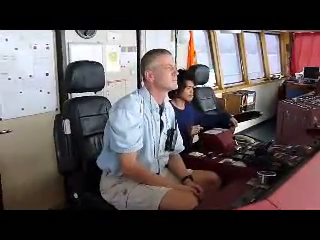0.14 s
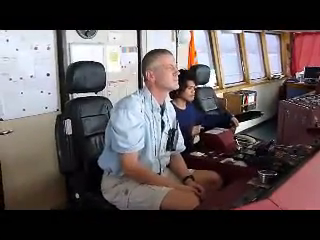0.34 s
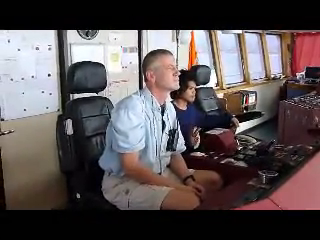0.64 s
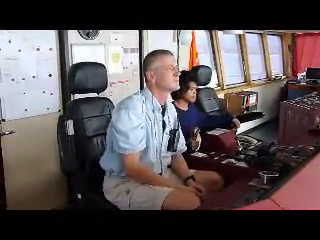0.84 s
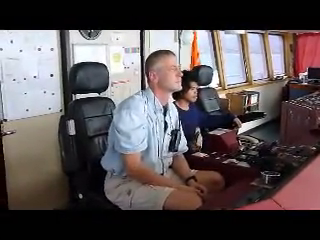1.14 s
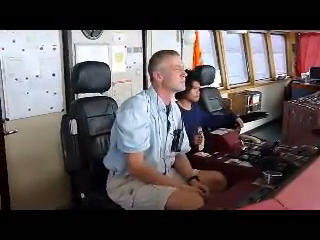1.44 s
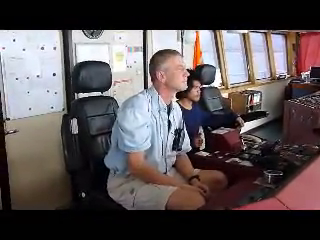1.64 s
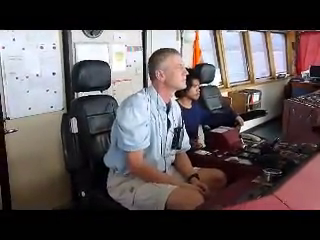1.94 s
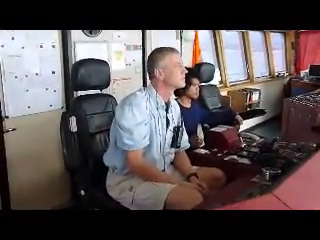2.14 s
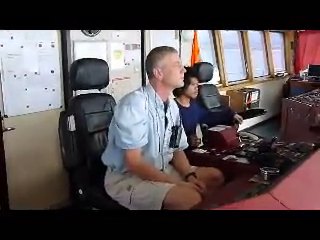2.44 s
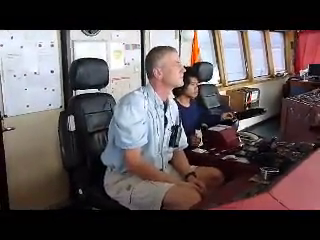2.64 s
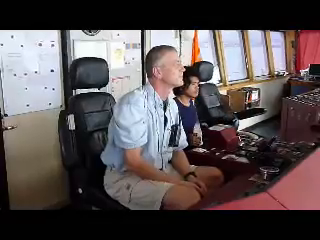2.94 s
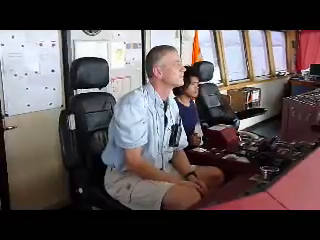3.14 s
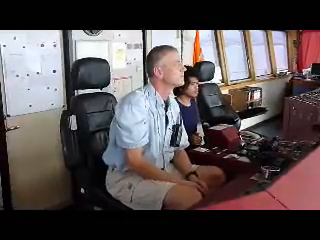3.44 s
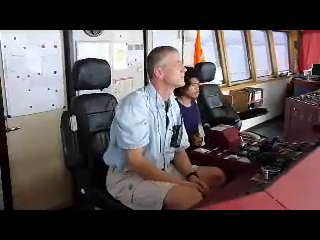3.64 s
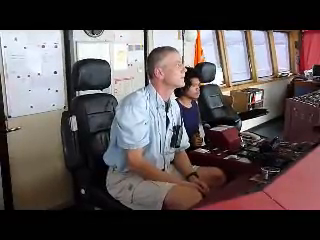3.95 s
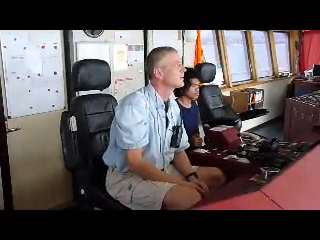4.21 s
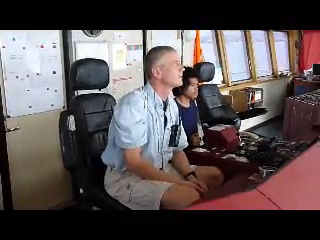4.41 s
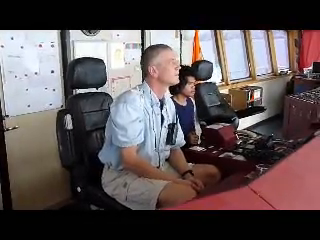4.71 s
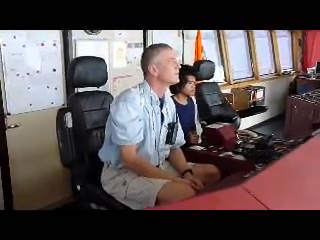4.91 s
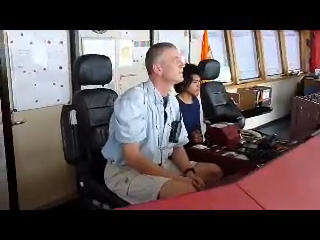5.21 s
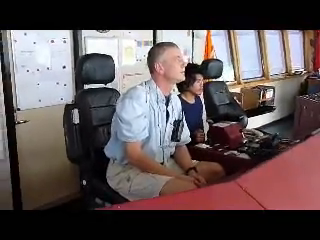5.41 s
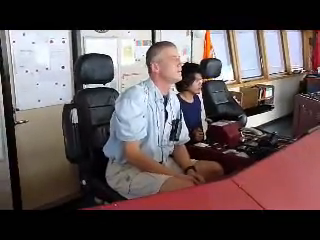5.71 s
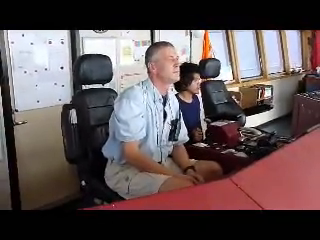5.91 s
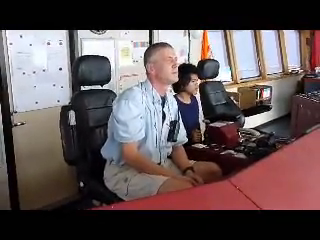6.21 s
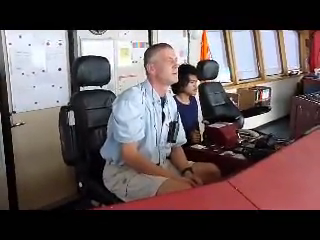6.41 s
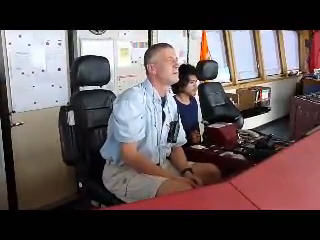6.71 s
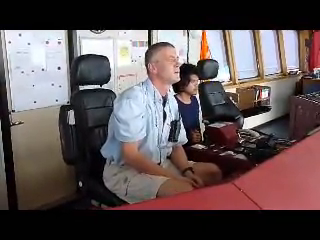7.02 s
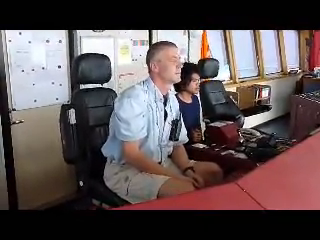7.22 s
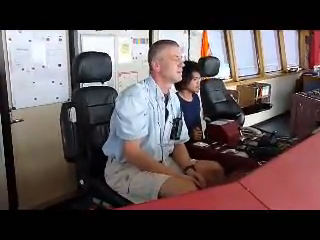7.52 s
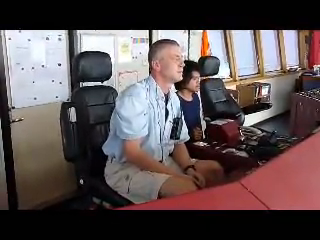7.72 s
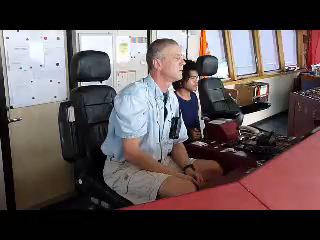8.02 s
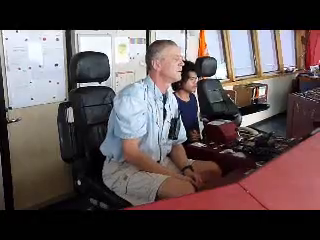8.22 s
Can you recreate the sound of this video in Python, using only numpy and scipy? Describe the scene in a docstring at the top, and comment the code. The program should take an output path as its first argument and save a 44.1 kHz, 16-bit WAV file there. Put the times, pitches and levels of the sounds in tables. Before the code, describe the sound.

Low ship engine rumble throbs continuously through a steel bridge, blended with muffled airy roar, wavering duct hum and one faint dull tick late.

```python
"""Ship's wheelhouse under way

High above a slow four-stroke diesel, the engine cycle hums through the steel as a comb of wavering sines.
Deck, panels and hull boom as resonant or coloured noise, with a wandering panel tone and brief hums.
Ventilation and water roar as echo-rippled noise over a duct hum and a whirr; gears whine faintly as sines.
One dull tick, a burst of noise, comes late; the microphone adds its own hiss."""
import sys
import numpy as np
from scipy import signal
from scipy.fft import rfft, irfft, next_fast_len
from scipy.io import wavfile

SR = 44100
rng = np.random.default_rng(int(sys.argv[2]) if len(sys.argv) > 2 else 0)


def bounce(signal):
    """Save signal as a 16-bit WAV file at the path given by the first command-line argument."""
    frames = np.transpose(np.atleast_2d(signal))
    limited = np.clip(frames, -1, 1)
    pcm = np.round(limited * 32767).astype(np.int16)
    wavfile.write(sys.argv[1], SR, pcm)


N = 368455
SIZE = next_fast_len(N, True)
HZ = np.arange(SIZE // 2 + 1) * SR / SIZE + 1e-3  # spectrum bins, kept above zero for the log axis

# Engine cycle rate over time, one cycle being two shaft turns: start_s, cycle_rate_hz
ENGINE_CYCLE = [(0, 4.183), (2.5, 4.178), (4.5, 4.174), (8.4, 4.175)]
# Tones of the engine cycle that reach the wheelhouse: multiple_of_cycle_rate, typical_level_db (rms)
ENGINE_ORDERS = [(6, -49.5), (7, -42.5), (8, -42), (9, -42), (10, -37), (11, -32.5), (12, -34), (14, -32),
                 (15, -41), (16, -31.5), (17, -38), (18, -35), (19, -48), (21, -44.5), (22, -36.5),
                 (23, -44), (24, -34.5), (25, -46), (27, -41), (28, -41.5), (31, -46), (32, -43), (33, -45),
                 (34, -47), (35, -52), (37, -52), (38, -50), (40, -56), (44, -46.5), (49, -54), (51, -53),
                 (54, -57.5), (59, -56.5), (60, -56), (66, -55.5), (69, -60), (70, -58.5), (71, -60.5),
                 (80, -54.5), (85, -61.5), (87, -57.5), (91, -65.5), (96, -54), (97, -62), (100, -63.5)]

# Boom modes of the deck: centre_hz, width_hz, relative_level_db
DECK_MODES = [(19.9, 3.2, -11.5), (27, 6, -9), (31.7, 7, -5), (43.5, 9.8, -2), (51.6, 6.2, -10)]
# Moments when the low deck noise happens to be louder: centre_s, lift_db
DECK_LOUDER = [(0.98, 5), (5.95, 7), (6.98, 1), (8.13, 4)]
DECK_DB, DECK_LOUDER_HALF_S = -27.5, 0.17  # level before the lifts

# Moments when the panel drone is louder: centre_s, lift_db, half_length_s
PANEL_LOUDER = [(0.88, 5, 0.1), (3.023, 5.5, 0.11), (6.3, 3, 0.18), (6.978, 13, 0.082), (7.507, 7.5, 0.09),
                (7.721, 11.5, 0.15), (7.967, 4, 0.061)]
PANEL_HZ, PANEL_WIDTH_HZ, PANEL_DB = 133.6, 16, -40.5  # noise part, level before the lifts
PANEL_TONE_HZ, PANEL_TONE_DB = 137, -3  # steadier core, level against the panel noise

# Colour of the broad hull rumble: frequency_hz, relative_density_db (per Hz)
HULL_COLOUR = [(17, -19), (26, -14.5), (55, -2.5), (76, -5), (85, -6), (105, -3), (123, -10.5), (150, -11),
               (200, -25)]
HULL_DB = -29

# Level of the duct hum's noise: time_s, level_db
DUCT_LEVEL = [(0, -46.5), (.9, -43.5), (1.35, -46), (1.6, -44), (1.9, -46.5), (2.4, -42.5), (3.3, -47.5),
              (3.9, -45.5), (4.4, -47.5), (4.65, -40), (5, -52), (5.4, -48), (5.7, -50), (6.1, -47),
              (7.1, -47.5), (7.4, -46), (8.35, -44.5)]
# Modes of the duct: centre_hz, width_hz, relative_level_db
DUCT_MODES = [(465.4, 24, -4), (488.7, 8.9, 0), (501.6, 10, -4.5)]
DUCT_TONE_HZ, DUCT_TONE_DB = 487, -7  # wavering core, level against the duct noise

# Modes of the faint whirr: centre_hz, width_hz, relative_level_db
WHIRR_MODES = [(927, 26, -0.5), (974, 28, 1), (1022, 40, -1)]
# Level of the faint whirr: time_s, level_db
WHIRR_LEVEL = [(0, -55), (1, -54), (2, -54.5), (3, -55), (4, -52), (4.7, -54.5), (5.2, -57.5), (6.5, -58),
               (8.35, -58)]

# Colour of the ventilation and water roar: frequency_hz, relative_density_db (per Hz)
ROAR_COLOUR = [(120, -21.5), (160, -1), (230, -4), (265, -6.5), (400, -8.5), (530, -11), (600, -11.5),
               (750, -15), (890, -18.5), (1450, -25), (2000, -32), (2600, -40.5), (3500, -50.5),
               (5000, -67.5)]
# Room resonances that shape the roar: centre_hz, width_hz, lift_db (negative dips)
ROOM_MODES = [(185, 20, 0.5), (208, 18, 4.5), (255, 18, 4), (300, 12, 4), (352, 70, 3), (633, 20, -2),
              (834, 120, 2), (910, 29, 3), (962, 22, 2.5), (1007, 40, 3.5), (1070, 27, 0.5),
              (1170, 50, 1.5), (1440, 54, 0.5), (2820, 30, 2), (2960, 110, 2), (2960, 640, 3.5)]
# Level of the roar, with small irregular rises and dips: time_s, level_db
ROAR_LEVEL = [(0, -34), (1.1, -33.5), (1.35, -33), (1.6, -33), (1.85, -32), (2.1, -34.5), (2.9, -34),
              (3.4, -33), (4.1, -31.5), (4.35, -33.5), (4.55, -32), (4.72, -30.5), (4.85, -34),
              (5.15, -32.5), (5.4, -33), (5.65, -33.5), (6.8, -33), (7.1, -33), (7.4, -33.5), (7.7, -33),
              (8.35, -33)]
# Centres of the roar's separately drifting parts: centre_hz
ROAR_PARTS = [200, 400, 800, 1600, 3200]
DRIFT_DB, DRIFT_RATE_HZ = 0.64, 3.6  # spread of each part's level, and new targets a second
ECHO_T60_S, ECHO_DB = 0.4, -16  # wheelhouse echoes, level against the direct roar

# Gear, pump and electrical whines: pitch_hz, typical_level_db (rms)
WHINES = [(931.3, -62), (972.4, -62), (1045, -68), (1073.6, -69), (1994.2, -80), (2821.5, -91),
          (2944.3, -90), (2967.5, -92), (4296.2, -94), (6666.5, -89), (9333.3, -94)]

# Brief swells of a higher hum: centre_s, peak_level_db (rms), half_length_s
HUM_SWELLS = [(7.23, -36, 0.06), (8.3, -39.5, 0.11)]
HUM_HZ = 251

TICK_S, TICK_ATTACK_S, TICK_T60_S = 7.401, 0.003, 0.09
TICK_DB, TICK_HZ, TICK_HALF_WIDTH_HZ = -47, 1600, 1100

# Colour of the microphone hiss: frequency_hz, relative_density_db (per Hz)
HISS_COLOUR = [(1500, -8), (3500, -0.5), (6000, -2.5), (8000, -6), (9500, -10.5), (10500, -17),
               (11500, -25.5)]
HISS_DB = -68.5  # before the filters
LOW_CUT_HZ, TOP_CUT_HZ = 19.5, 11800
OFFSET = -0.0054  # converter offset, full scale = 1


def undb(db):
    """Gain of a level in dB."""
    return 10 ** (np.asarray(db) / 20)


def level(x, db):
    """Scale to an rms level."""
    return x * undb(db) / np.sqrt(np.mean(x ** 2))


def curve(t, points):
    """Straight lines between (time, value) points."""
    return np.interp(t, *np.transpose(points))


def slope(points):
    """Gain per frequency from (Hz, dB) points on a log axis, nearly silent outside them."""
    hz, db = np.transpose(points)
    return undb(np.interp(np.log(HZ), np.log(hz), db, left=-90, right=-90))


def peak(hz, width_hz):
    """Steep resonance: 1 at the centre, a quarter at half a width to either side."""
    return 1 / (1 + (2 * (HZ - hz) / width_hz) ** 2) ** 2


def noise(gain):
    """Noise of the given colour, rms 1."""
    spectrum = rfft(rng.standard_normal(SIZE)) * gain
    return level(irfft(spectrum, SIZE)[:N], 0)


def rung(modes):
    """Turbulence rings a set of modes as noise whose mode powers add, rms 1."""
    power = sum(undb(2 * db) * peak(hz, width_hz) for hz, width_hz, db in modes)
    return noise(np.sqrt(power))


def walk(centre, spread, rate_hz, shape=np.asarray):
    """Random drift about a centre: straight lines between random knots, rate_hz of them a second."""
    knots = shape(centre + spread * rng.standard_normal(int(N / SR * rate_hz) + 2))
    return np.interp(np.arange(N) * (rate_hz / SR), np.arange(len(knots)), knots)


def tones(cycles, table, waver_db, slip_rad):
    """Sines that each waver a little in level and phase as the load shifts."""
    total = 0
    for multiple, db in table:
        gain = walk(db, waver_db, 1.507, undb)
        phase = walk(2 * np.pi * rng.random(), slip_rad, 1.5)
        total = total + gain * np.sin(2 * np.pi * multiple * cycles + phase)
    return np.sqrt(2) * total


def drone(hz, wander_hz, rate_hz):
    """A tone whose pitch wanders, rms 1."""
    cycles = rng.random() + np.cumsum(walk(hz, wander_hz, rate_hz)) / SR
    return np.sqrt(2) * np.sin(2 * np.pi * cycles)


def bump(t, at_s, lift, half_s):
    """A smooth bell-shaped rise and fall."""
    return lift * np.exp(-((t - at_s) / half_s) ** 2)


def engine(t):
    """Diesel engine cycle, heard through the steel as multiples of one slowly changing rate."""
    cycles = np.cumsum(curve(t, ENGINE_CYCLE)) / SR
    return tones(cycles, ENGINE_ORDERS, waver_db=0.77, slip_rad=0.14)


def deck(t):
    """Low deck modes boom with noise that is louder at a few moments."""
    level_db = DECK_DB + sum(bump(t, at_s, db, DECK_LOUDER_HALF_S) for at_s, db in DECK_LOUDER)
    return undb(level_db) * rung(DECK_MODES)


def panel(t):
    """One panel resonance rings as noise around a wandering tone, both louder at the same moments."""
    level_db = PANEL_DB + sum(bump(t, *row) for row in PANEL_LOUDER)
    ringing = noise(np.sqrt(peak(PANEL_HZ, PANEL_WIDTH_HZ)))
    core = undb(PANEL_TONE_DB) * drone(PANEL_TONE_HZ, wander_hz=2.5, rate_hz=6)
    return undb(level_db) * (ringing + core)


def hull():
    """Broad low rumble of the hull, as coloured noise."""
    return level(noise(slope(HULL_COLOUR)), HULL_DB)


def duct(t):
    """Turbulence rings the duct modes around a wavering tone."""
    core = undb(DUCT_TONE_DB) * drone(DUCT_TONE_HZ, wander_hz=6, rate_hz=7)
    return undb(curve(t, DUCT_LEVEL)) * (rung(DUCT_MODES) + core)


def whirr(t):
    """Faint whirr: noise in a few narrow bands, slowly changing in level."""
    return undb(curve(t, WHIRR_LEVEL)) * rung(WHIRR_MODES)


def roar(t):
    """Broad air noise shaped by the room and rippled by echoes; each part of the range drifts alone."""
    tail = rng.standard_normal(SR) * undb(-60 * np.arange(SR) / SR / ECHO_T60_S)
    tail = tail / np.sqrt(np.sum(tail ** 2))
    ripple = np.abs(1 + undb(ECHO_DB) * rfft(tail, SIZE))
    room = undb(sum(db * peak(hz, width_hz) for hz, width_hz, db in ROOM_MODES))
    spectrum = rfft(rng.standard_normal(SIZE)) * ripple * slope(ROAR_COLOUR) * room
    air = 0
    for row in np.eye(len(ROAR_PARTS)):
        share = np.interp(np.log(HZ), np.log(ROAR_PARTS), row)  # neighbours crossfade
        part = irfft(spectrum * share, SIZE)[:N]
        air = air + walk(0, DRIFT_DB, DRIFT_RATE_HZ, undb) * part
    return undb(curve(t, ROAR_LEVEL)) * level(air, 0)


def whines(t):
    """Gears, pumps and electrics sing as faint fixed-pitch sines."""
    return tones(t, WHINES, waver_db=3.0, slip_rad=0.32)


def hum(t):
    """A higher wandering tone that surfaces only in brief swells."""
    gain = sum(bump(t, at_s, undb(db), half_s) for at_s, db, half_s in HUM_SWELLS)
    return gain * drone(HUM_HZ, wander_hz=1.5, rate_hz=6)


def tick(t):
    """A short dull noise burst in the cabin that rises softly and dies away."""
    age_s = t - TICK_S
    rise = np.clip(age_s / TICK_ATTACK_S, 0, 1) ** 2  # zero before the tick
    decay = undb(TICK_DB - 60 * np.abs(age_s) / TICK_T60_S)
    return rise * decay * noise(peak(TICK_HZ, 2 * TICK_HALF_WIDTH_HZ))


def scene():
    """Mix the engine, booming steel, moving air, whines and one tick."""
    t = np.arange(N) / SR
    steel = deck(t) + panel(t) + hull() + hum(t)
    air = duct(t) + whirr(t) + roar(t)
    return (engine(t) + steel + air + whines(t) + tick(t))[None]


def record(dry):
    """Microphone hiss, a cut of the deepest bass, a steep cut of the top and a small converter offset."""
    wet = dry + level(noise(slope(HISS_COLOUR)), HISS_DB)
    # a mirrored lead-in lets the filters settle
    wet = np.pad(wet, ((0, 0), (SR, 0)), mode="reflect", reflect_type="odd")
    low_cut = signal.ellip(6, 0.3, 50, LOW_CUT_HZ, "high", fs=SR, output="sos")
    top_cut = signal.ellip(8, 0.2, 70, TOP_CUT_HZ, fs=SR, output="sos")
    wet = signal.sosfilt(top_cut, signal.sosfilt(low_cut, wet))
    return OFFSET + wet[:, SR:]


dry = scene()
out = record(dry)
bounce(out)
```